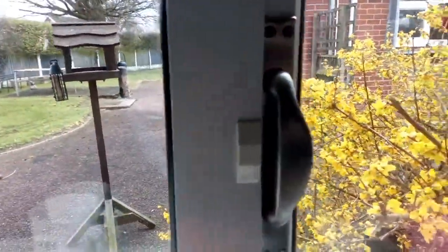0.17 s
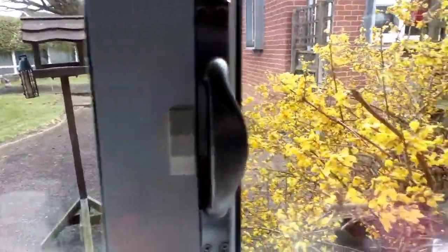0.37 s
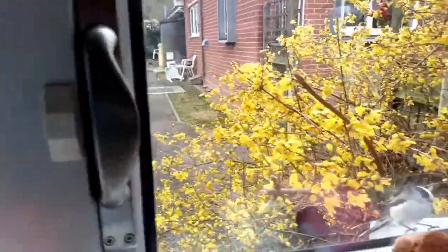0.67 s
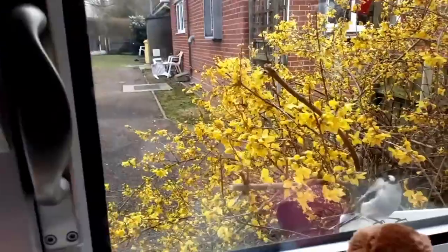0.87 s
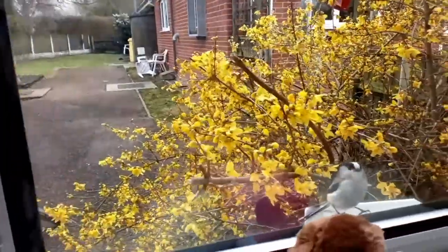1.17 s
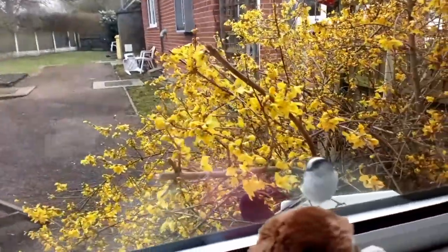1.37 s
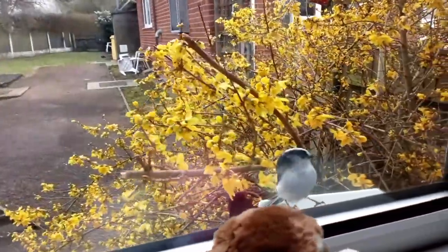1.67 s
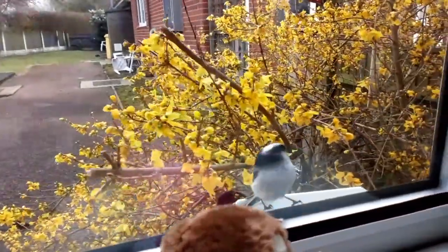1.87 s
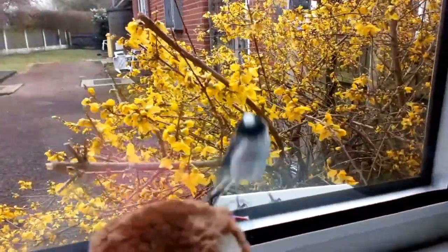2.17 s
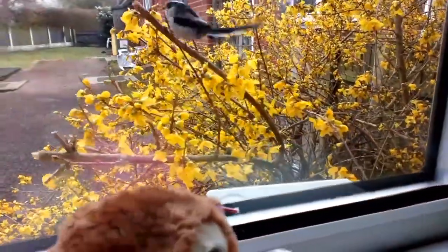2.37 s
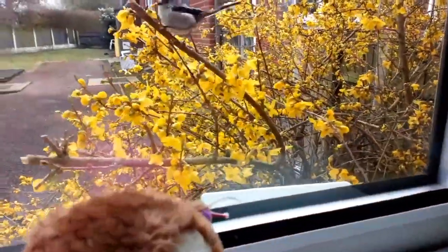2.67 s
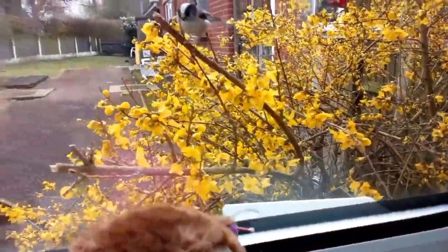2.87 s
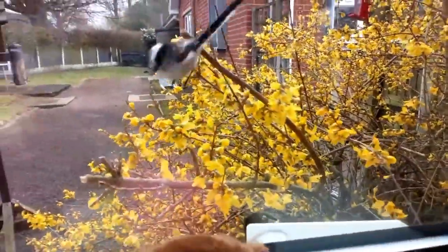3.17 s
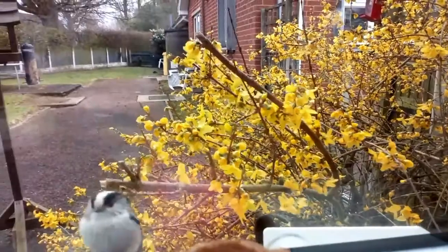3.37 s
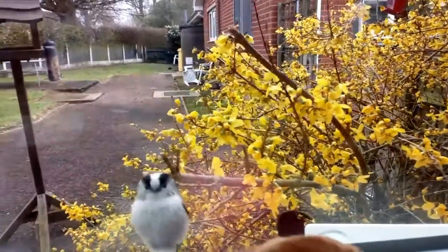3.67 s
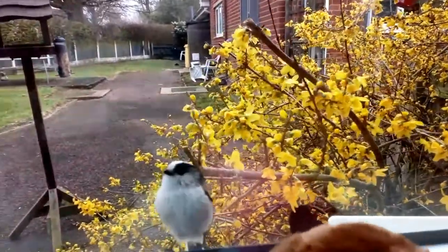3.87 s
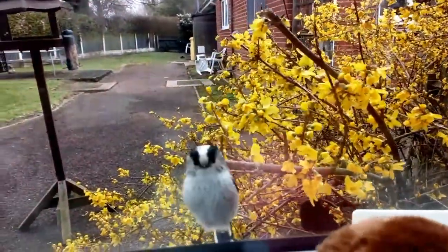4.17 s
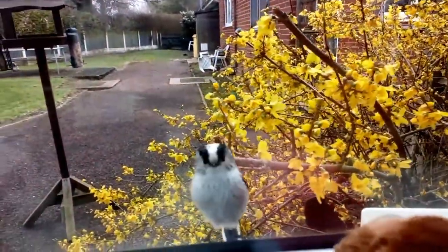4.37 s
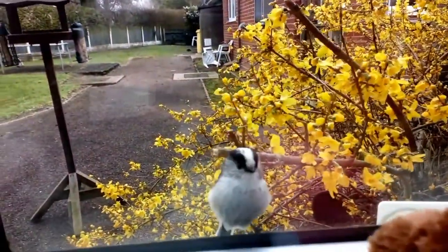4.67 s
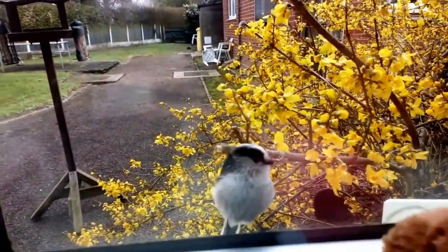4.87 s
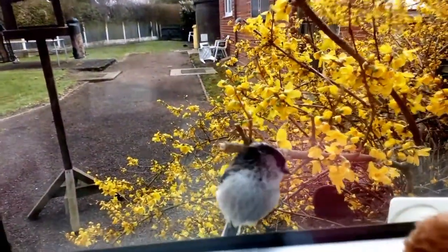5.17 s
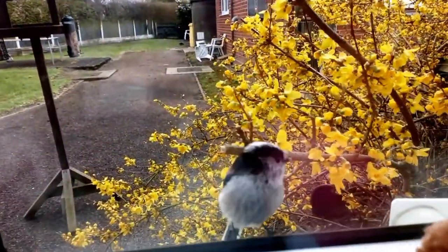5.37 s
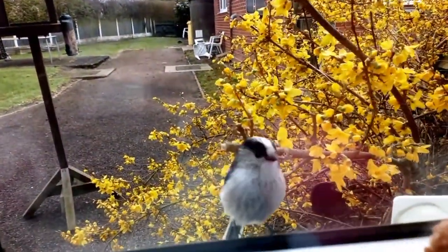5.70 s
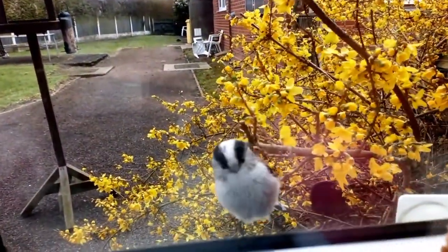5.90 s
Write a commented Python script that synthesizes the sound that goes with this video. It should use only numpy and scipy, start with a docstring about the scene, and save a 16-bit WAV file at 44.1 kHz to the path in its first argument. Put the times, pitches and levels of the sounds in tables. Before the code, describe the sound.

In a quiet room, a small bird taps the outside of a window: several soft, hollow, low knocks in the first second, then a lull with dull handling bumps and a barely audible wing flutter. It lands back with one firmer knock and faint claw scratches. Later a very sharp fingernail click snaps at the left microphone, followed by rubbing and small thumps. Low rumble, hiss and a thin whine continue throughout.

```python
"""Small bird at a window

A small bird taps and bumps against a double-glazed window, heard from inside a quiet room.
Banks of decaying sines ring the pane and thump the camera body; shaped noise makes claws, wings and cloth.
The hand holding the camera shifts and rubs, and a fingernail, a burst of port impulses, clicks at the
left microphone. Steady noise rumbles and hisses throughout, under a faint wandering sine whine."""
import sys
import numpy as np
from scipy import signal
from scipy.fft import rfft, irfft, next_fast_len
from scipy.io import wavfile
from scipy.ndimage import map_coordinates

SR = 44100
rng = np.random.default_rng(int(sys.argv[2]) if len(sys.argv) > 2 else 0)


def master(y):
    """Save y as 16-bit WAV."""
    cut = np.clip(np.atleast_2d(y).T, -1, 1)
    pcm = np.round(cut * 32767)  # scale
    wavfile.write(sys.argv[1], SR, pcm.astype(np.int16))


N = 266187  # length of the scene [samples]


def amp(db):
    """Decibels to gain."""
    return 10 ** (np.asarray(db) / 20)


def unit(x):
    """Scale to rms 1."""
    return x / np.sqrt(np.mean(x ** 2) + 1e-20)


def panned(db):
    """Left and right gains of unchanged total power for a left-right difference in dB."""
    gains = amp(np.array([[.5], [-.5]]) * db)
    return gains / np.sqrt(np.mean(gains ** 2, axis=0))


def along(points, hz):
    """Read (frequency [Hz], value) points on a log frequency axis."""
    point_hz, value = np.transpose(points)
    return np.interp(np.log(hz + 1), np.log(point_hz + 1), value)


def filtered(x, response):
    """Filter x by a gain given as a function of frequency."""
    n = x.shape[-1]
    padded = next_fast_len(n + 8192)
    spectrum = rfft(x, padded) * response(np.fft.rfftfreq(padded, 1 / SR))
    return irfft(spectrum, padded)[..., :n]


def wobble(rate):
    """A smooth random curve with rate knots a second."""
    knots = rng.standard_normal(int(N * rate / SR) + 4)
    return map_coordinates(knots, [np.arange(N) * rate / SR])


def noise(response, alike, size=N):
    """Coloured stereo noise of rms 1; alike is the common share, negative when the sides move in opposition."""
    share = np.clip(abs(alike), 0, 1)
    white = rng.standard_normal((3, size))
    common = np.array([[1], [np.copysign(1, alike)]]) * white[2]
    mixed = np.sqrt(share) * common + np.sqrt(1 - share) * white[:2]
    return unit(filtered(mixed, response))


def shape(points):
    """The gain curve through (frequency [Hz], level [dB]) points."""
    return lambda f: amp(along(points, f))


def band(hz, width_hz):
    """A resonance with steep skirts; width_hz is about its noise bandwidth."""
    return lambda f: 1 / (1 + ((f * f - hz * hz) / (1.28 * width_hz * f + 1e-6)) ** 2)


def add(track, s, sound):
    """Mix a sound into the track from time s."""
    start = max(round(s * SR), 0)
    part = sound[..., :max(N - start, 0)]
    track[..., start:start + part.shape[-1]] += part


def swell(x, s, half, db):
    """A bell-shaped swell of x that reaches db at time s and is 5 dB down half a length either side."""
    bell = np.exp(-((np.arange(N) / SR - s) / half) ** 2 / 2 * 1.146)
    return amp(db) * unit(x * bell) * np.sqrt(np.mean(bell ** 2))


# Decay of the room: (frequency [Hz], time to fall 60 dB [s])
ROOM_DECAY = [(100, 0.74), (400, 0.221), (2000, 0.254), (10000, 0.045)]


def room(x, wet_db):
    """x with the room's diffuse answer, decaying noise whose treble dies first."""
    hz, t, grid = signal.stft(rng.standard_normal((2, SR // 2)), SR, nperseg=256)
    decay = amp(-60 * t / along(ROOM_DECAY, hz)[:, None])
    tail = signal.istft(grid * decay, SR, nperseg=256)[1]
    tail = np.pad(tail / np.linalg.norm(tail[0]), ((0, 0), (300, 0)))  # 300 samples of pre-delay
    return x + amp(wet_db) * signal.fftconvolve(x, tail, axes=1)[:, :x.shape[1]]


# Room rumble colour: (frequency [Hz], relative level [dB per Hz])
AIR_COLOUR = [(12, -65.5), (20, -5.5), (139, -2), (200, -5), (312, -8), (528, -12.5), (700, -14),
              (987, -18), (1420, -18.5), (1700, -20), (2500, -27.5), (3250, -47.5), (5500, -120)]
# Microphone hiss colour: (frequency [Hz], left relative level [dB per Hz], right relative level [dB per Hz])
HISS_COLOUR = [(300, -3.5, -1), (1503, -4.5, -4.5), (2710, -0.5, -1), (6230, -2.5, -3.5), (8190, -8, -10.5),
               (9410, -6, -13), (12240, -18, -10.5), (13320, -6, -25.5), (15126, -4, -20.5),
               (15110, -2, 12.5), (15620, -37, -52.5)]
# Level of the electronic whine: (time [s], level [dB])
WHINE_LEVEL = [(0, -67.5), (1.8, -69.5), (2, -73), (3.3, -71.5), (3.55, -66.5), (3.8, -71.5), (6, -73)]
# Partials of the whine: (multiple of its pitch [ratio], relative level [dB])
WHINE_PARTIALS = [(1, 0), (1.5, -11), (2, -14)]
WHINE_HZ, WHINE_DRIFT_HZ, WHINE_JITTER_HZ = 6450, 29.6, 22.11  # centre, slow and fast wander


def background(air_db=-59.5, hiss_db=-64.0):
    """Low room noise, microphone hiss and a thin whine on the left that wanders in pitch and level."""
    air = noise(shape(AIR_COLOUR), 0.121) * amp(air_db + 0.36 * wobble(4.784))

    def hiss_gain(f):
        """One hiss curve for each microphone."""
        return np.array([shape(np.array(HISS_COLOUR)[:, [0, side]])(f) for side in (1, 2)])

    out = air + amp(hiss_db) * noise(hiss_gain, 0)
    hz = WHINE_HZ + WHINE_DRIFT_HZ * wobble(2.2) + WHINE_JITTER_HZ * wobble(90)
    db = np.interp(np.arange(N) / SR, *np.transpose(WHINE_LEVEL))
    phase = 2 * np.pi * np.cumsum(hz) / SR
    out[0] += sum(amp(db + partial_db) * np.sin(k * phase) for k, partial_db in WHINE_PARTIALS)
    return out


# Blows on the glass: (time [s], level [dB], spot across [0-1], spot up [0-1], hardness [dB per octave],
# highest pitch the contact excites [Hz], ring length [factor], left-right [dB])
TAPS = [(0.005, -37.5, .351, 0.42, -3.5, 1400, 1.25, -2.5), (0.119, -35, 0.3, 0.42, 1.28, 1004, 0.93, -2.5),
        (0.3235, -67, .36, 0.4, 18, 1380, .36, -2), (0.324, -30.5, .36, .398, -2, 1550, 1.1, -.5),
        (0.453, -53, 0.32, 0.4, 2.5, 1000, 0.91, 0), (0.679, -43, 0.37, 0.38, 7.5, 1156, 0.414, 4),
        (0.684, -27, 0.37, 0.38, 4, 985, 0.912, 2.5), (3.399, -27, .403, .303, 3, 1175, .94, 3)]
# Modes of the window pane: (frequency [Hz], level [dB], time to fall 60 dB before the blow's factor [s],
# left-right before the blow's own [dB], left leads by [radians])
PANE_MODES = [(171.6, -15.5, 0.0034, -3, 1), (198, -17, 0.113, -1.5, 0), (240.9, 0, 0.2648, -4, -.28),
              (388.9, -4.5, 0.1764, -4, -1), (419.3, -11, 0.1451, -1.5, -1.18), (502.5, -15, .12, 1, 0),
              (531.1, -8, 0.2139, 5.5, 0.4), (570.3, -23, 0.2118, 4, 0.5), (714, -27, 0.1328, -8.5, 0.62),
              (796.4, -11, 0.1042, -4.5, -1.05), (819.5, -7.5, 0.091, -3, -.5),
              (934, -16.5, 0.1841, 1, -1.57), (1055, -19, 0.0846, -8.5, -0.09),
              (1088.2, -21.5, 0.0656, -6.5, -0.5), (1126, -23.5, 0.0573, -5, -0.5),
              (1262, -20, 0.188, -2.5, -2.09), (1331, -20, 0.098, -4, -2.5),
              (1374, -11, 0.0584, -8.5, -1.1), (1714, -21.5, 0.1643, 8, 1.24), (2123, -22.5, 0.16, -1.5, 0)]
# Pattern of each of those modes: (across [half waves], up [half waves])
MODE_PATTERNS = [(2, 1), (1, 2), (3, 1), (3, 2), (1, 3), (2, 3), (3, 3), (4, 2), (1, 4), (2, 4), (5, 2),
                 (5, 3), (4, 4), (6, 2), (1, 5), (3, 5), (7, 1), (5, 4), (8, 1), (8, 3)]
# Dense short clatter of the frame: (frequency [Hz], relative level [dB per Hz])
FRAME_COLOUR = [(40, -20.5), (130, 5.5), (400, -2.5), (700, -2.5), (1000, -10.5), (1600, -6.5), (2500, -13),
                (5000, -17), (9000, -45)]
HARDNESS_HZ = 240  # a harder contact tilts the ring about this pitch
NODE_DB = -14  # what a mode still gets when struck on its node


def pane(build=0.00985, hold=1.758, frame_db=-15, frame_t60=0.1585, waver=0.352):
    """Each blow rings the glass; where it lands and how hard the contact is decide which modes speak."""
    out, t = np.zeros((2, N)), np.arange(int(.5 * SR)) / SR
    hz, mode_db, life, mode_pan_db, lead = np.transpose(PANE_MODES)
    # bending waves take some milliseconds to fill the pane, the slow low ones longest
    rise = 1 - np.exp(-t / (build * np.sqrt(hz[0] / hz[:, None])))
    for s, db, across, up, hardness_db, top_hz, ring_length, pan_db in TAPS:
        tilt = amp(hardness_db * np.log2(hz / HARDNESS_HZ))
        contact = tilt / np.sqrt(1 + (hz / top_hz) ** 10)
        # a mode speaks as strongly as the struck spot moves in its pattern
        motion = np.sin(np.pi * np.array(MODE_PATTERNS) * [across, up]).prod(axis=1)
        reach = np.hypot(motion, amp(NODE_DB))
        # each mode radiates its own pattern, so the two microphones hear it unequally and out of step
        weight = panned(mode_pan_db + pan_db) * reach * contact * amp(mode_db)
        phase = rng.uniform(0, 2 * np.pi, len(hz)) + np.array([lead, -lead]) / 2
        # the ring holds at first, then falls away ever faster
        fade = weight[..., None] * amp(-60 * (t / (ring_length * life[:, None])) ** hold)
        # the phase of each mode wanders a little at random, blurring its pitch
        drift = waver * signal.resample(rng.standard_normal((len(hz), 20)), len(t), axis=1)
        wave = np.sin(2 * np.pi * hz[:, None] * t + phase[..., None] + drift)
        ring = (rise * fade * wave).sum(axis=1)
        # a soft contact dulls the frame too
        frame_colour = lambda f: shape(FRAME_COLOUR)(f) / (1 + (f / top_hz) ** 2)
        clatter_fade = amp(frame_db - 60 * t / frame_t60) * rise[-1]
        clatter = clatter_fade * noise(frame_colour, 0.99, size=len(t))
        add(out, s, room(amp(db) * (ring + clatter), wet_db=-20.5))
    return out


# Claws scratch as the bird grips and lands: (time [s], level [dB], slide length [s], time to fall 60 dB [s])
CLAW_SCRATCHES = [(0.222, -62, 0.0103, 0.049), (0.318, -63, 0.0112, 0.084), (3.284, -61.5, 0.026, 0.09),
                  (3.377, -50, 0.0063, 0.065), (3.392, -51.5, 0.0058, 0.057), (3.399, -59.5, 0.0089, 0.16),
                  (4.655, -62.5, 0.0112, 0.044)]
# Thin narrow tones, short squeaks and a long faint ring of the glass:
# (time [s], level [dB], length [s], pitch [Hz])
THIN_TONES = [(0.221, -62, 0.0116, 2562), (0.395, -67, .008, 2650), (0.417, -68, .006, 2630),
              (3.57, -73, .21, 1726)]
# Colour of a claw on glass: (frequency [Hz], relative level [dB per Hz])
SCRAPE_COLOUR = [(150, -20), (500, 2.5), (1300, -3.5), (2200, 2), (3400, 0), (4800, -4.5), (6300, -3.5),
                 (7500, -22.5), (12000, -43)]
TONE_WIDTH_HZ, TONE_T60 = 62, 0.068  # bandwidth [Hz], time to fall 60 dB [s]


def claws(grain_db=3.5, attack=0.00077):
    """Gritty claw scratches and thin tones: each is noise that holds for its length, then dies away."""
    out, t = np.zeros((2, N)), np.arange(SR // 4) / SR
    scratches = [(s, db, length, t60, shape(SCRAPE_COLOUR)) for s, db, length, t60 in CLAW_SCRATCHES]
    tones = [(s, db, length, TONE_T60, band(hz, TONE_WIDTH_HZ)) for s, db, length, hz in THIN_TONES]
    for s, db, length, t60, colour in scratches + tones:
        grit = unit(amp(grain_db * wobble(302)[:len(t)]))  # a fast random roughness in level
        envelope = amp(-60 * np.maximum(t - length, 0) / t60) * (1 - np.exp(-t / attack))
        grainy = unit(envelope * grit * noise(colour, 0.355, size=len(t)))
        add(out, s, amp(db) * np.sqrt(np.mean(envelope ** 2)) * grainy)
    return room(out, wet_db=-10)


# Dull bumps, mostly from the shifting hands: (middle [s], half length [s], level [dB], pitch [Hz],
# left-right [dB], left-right likeness [-1 to 1])
BUMPS = [(1.588, 0.0347, -47, 86.5, 1, 0.79), (1.696, 0.039, -51, 89.6, 1, 0.76),
         (2.211, 0.0187, -51, 78, -4, 0.76), (2.278, 0.0275, -50, 77.7, -0.5, 0.59),
         (3.567, 0.026, -59.5, 315.3, -1, 0.72), (5.319, 0.0202, -49, 465, -7.5, 0.54),
         (5.32, 0.054, -48.5, 70.2, 1.5, -.6), (5.373, 0.0235, -57, 386, -11.5, 0.37),
         (5.976, 0.0273, -53.5, 368, -5.5, 0.32), (5.938, 0.0594, -48.5, 81, 3.5, -0.76)]
# Skin sliding by the left microphone: (middle [s], half length [s], level [dB])
RUBS = [(5.407, .004, -54), (5.425, 0.0151, -47.5), (5.546, 0.0094, -64), (5.593, 0.0146, -61),
        (5.748, 0.0223, -63.5), (5.829, .003, -57.5), (5.847, 0.0099, -57.5), (5.892, 0.0224, -55)]
# Handling, low rumbles with soft rustles and a few very short scrapes, and near 3.15 s a faint rustle of the
# bird's wings: (middle [s], half length [s], rumble level [dB], rustle level [dB])
HANDLING = [(2.28, 0.105, -59.5, -81.5), (2.905, 0.0293, -56, -77.5), (3.151, 0.057, -85.5, -67.5),
            (5.327, 0.0433, -50.5, -60), (5.947, 0.0687, -51.5, -65), (5.9678, .002, -54.5, -50),
            (5.981, 0.003, -52.5, -49.5), (6.008, 0.0178, -60, -63), (6.033, 0.0044, -60, -55.5)]
# Colour of sliding skin: (frequency [Hz], relative level [dB per Hz])
SKIN_COLOUR = [(1500, -37.5), (3200, -12), (4800, -0.5), (5600, -1), (6500, 5.5), (7200, -3), (8200, -18),
               (14000, -47)]
# Colour of the rustles: (frequency [Hz], relative level [dB per Hz])
RUSTLE_COLOUR = [(300, -34), (900, -10), (2200, 10), (4000, 4.5), (6500, 3.5), (8500, -9.5), (14000, -19)]
BUMP_WIDTH_HZ, RUMBLE_HZ, RUMBLE_WIDTH_HZ = 42.5, 163.7, 245


def hands():
    """Swells of noise: dull bumps, skin sliding near the left port, handling rumbles, rustles and scrapes."""
    bumps = sum(panned(pan_db) * swell(noise(band(hz, BUMP_WIDTH_HZ), alike), s, half, db)
                for s, half, db, hz, pan_db, alike in BUMPS)
    # sticking and slipping make the skin grainy
    skin = noise(shape(SKIN_COLOUR), 0) * amp(2.2 * wobble(250)) * amp([[0], [-16]])
    rustle = noise(shape(RUSTLE_COLOUR), 0.155) * amp(1.57 * wobble(120)) * amp([[1.5], [-1.5]])
    rumble = noise(band(RUMBLE_HZ, RUMBLE_WIDTH_HZ), 0.355)
    handling = sum(swell(rumble, s, half, rumble_db) + swell(rustle, s, half, rustle_db)
                   for s, half, rumble_db, rustle_db in HANDLING)
    rubs = sum(swell(skin, s, half, db) for s, half, db in RUBS)
    return bumps + handling + rubs


TAKEOFF_S, TAKEOFF_HALF_S, WING_DB = 2.265, .05, -65  # middle, half length, level
WING_HZ, WING_WIDTH_HZ, WINGBEATS_PER_S, WINGBEAT_DB = 1016, 1010, 26, 2


def wings():
    """The bird takes off, dulled by the glass: a soft flutter of noise that pulses with each wingbeat."""
    beat = amp(WINGBEAT_DB * np.sin(2 * np.pi * WINGBEATS_PER_S * np.arange(N) / SR))
    flutter = beat * noise(band(WING_HZ, WING_WIDTH_HZ), 0.294)
    return swell(flutter, TAKEOFF_S, TAKEOFF_HALF_S, WING_DB)


# The grip slips in jerks, each a short woody knock of the camera's shell:
# (time [s], peak level of the tone [dB], pitch [Hz])
JERKS = [(2.879, -51.5, 369.8), (2.895, -50, 347.5), (2.921, -45.5, 292.8), (2.943, -46, 309),
         (2.965, -51.5, 310), (5.908, -43.5, 215), (5.918, -43, 360), (5.935, -43, 375)]
JERK_PEAK_S = 0.00643  # time from start to peak
JERK_GRIT_DB, JERK_GRIT_WIDTH_HZ = -10.5, 558  # grit relative to the tone, its bandwidth


def grip():
    """Each jerk of the fingers swells the shell's ring for a few cycles, with some grit."""
    out, t = np.zeros((2, N)), np.arange(SR // 10) / SR
    envelope = (t / JERK_PEAK_S * np.exp(1 - t / JERK_PEAK_S)) ** 2
    for s, db, hz in JERKS:
        grit = amp(JERK_GRIT_DB) * noise(band(hz, JERK_GRIT_WIDTH_HZ), 0.273, size=len(t))
        add(out, s, amp(db) * envelope * (np.sin(2 * np.pi * hz * t) + grit))
    return out


# The nail skips over the camera case, catching (+1) and releasing (-1):
# (time after first touch [s], level relative to NAIL_DB [dB], direction [+1 or -1])
NAIL_SKIPS = [(0, -10, 1), (.00056, -9, -1), (.00121, 0, 1)]
# Then it rebounds lightly: (time after first touch [s], level [dB])
NAIL_REBOUNDS = [(.005, -18), (0.0121, -27)]
# Response of the microphone port under the nail: (frequency [Hz], level [dB])
PORT_RESPONSE = [(50, -6), (300, 6), (900, 11.5), (1250, 6.5), (1650, 11), (2200, 11.5), (3100, 14),
                 (4100, 15), (4700, 16), (5600, 20.5), (6500, 15.5), (7400, 0.5), (10500, -6), (12500, 0.5),
                 (15500, 6), (19000, -5.5)]
NAIL_S, NAIL_DB, REBOUND_TOP_HZ = 5.27232, 2, 7000  # first touch, skip level, rebound low-pass
FIZZ_S, FIZZ_DB, FIZZ_HZ, FIZZ_WIDTH_HZ = 0.00205, -27, 7200, 7200  # length, level, centre, bandwidth


def nail(right_db=-26, size=2048):
    """A few tiny impacts ring the left port over a faint 2 ms fizz of noise; the rebounds are duller."""
    # minimum phase from the folded cepstrum: sharp front, short ring
    cepstrum = irfft(np.log(shape(PORT_RESPONSE)(np.fft.rfftfreq(size, 1 / SR))))
    tick = irfft(np.exp(rfft(2 * cepstrum[:size // 2], size) - cepstrum[0]))
    low_pass = signal.butter(2, REBOUND_TOP_HZ, fs=SR, output="sos")
    soft_tick = signal.sosfilt(low_pass, tick)
    pushes = [(delay, direction * amp(NAIL_DB + db) * tick) for delay, db, direction in NAIL_SKIPS]
    pushes += [(delay, amp(db) * soft_tick) for delay, db in NAIL_REBOUNDS]
    out = np.zeros((2, N))
    for delay, push in pushes:
        add(out[0], NAIL_S + delay, push)
        add(out[1], NAIL_S + delay + 0.00072, amp(right_db) * push)  # the far microphone hears it later
    fizz = noise(band(FIZZ_HZ, FIZZ_WIDTH_HZ), 0, size=round(FIZZ_S * SR))[0]
    add(out[0], NAIL_S, amp(FIZZ_DB) * fizz)  # from the first touch
    return room(out, wet_db=-35.0)


def contacts(gap_s, ratio, count=3):
    """Delays of a run of contacts, each gap ratio times the one before."""
    return np.append(0, np.cumsum(gap_s * ratio ** np.arange(count - 1)))


# The finger presses on the case and settles:
# (time [s], gain on the modes [dB], loss at the second contact, growing as the root of the count [dB])
PRESSES = [(5.2743, 2.5, 12.5), (5.314, -14, 14), (5.541, -25.5, 12), (5.922, -20.5, 8),
           (5.964, -24.5, 6.5)]
# Modes of the camera body: (frequency [Hz], left level [dB], right level [dB], time to fall 60 dB [s])
CASE_MODES = [(126.5, -41.5, -60, 0.11), (166, -26, -54.5, 0.0334), (320.2, -34, -23.5, 0.032),
              (428.4, -50, -37.5, 0.035), (942, -49.5, -33, 0.023)]
SETTLE_S, SETTLE_GROWTH = 0.014, 1.68  # first gap [s], each gap over the one before [ratio]


def case(low_cut_hz=125):
    """The camera body thumps under each press of the finger, then more softly as the finger settles."""
    out, t = np.zeros((2, N)), np.arange(SR // 4) / SR
    thump = np.zeros((2, len(t)))
    for hz, left_db, right_db, t60 in CASE_MODES:
        fade = amp(np.array([[left_db], [right_db]]) - 60 * t / t60)
        thump -= fade * np.sin(2 * np.pi * hz * t)
    for s, db, loss_db in PRESSES:
        for k, delay in enumerate(contacts(SETTLE_S, SETTLE_GROWTH)):
            add(out, s + delay, amp(db - loss_db * np.sqrt(k)) * thump)
    return signal.sosfilt(signal.butter(2, low_cut_hz, "highpass", fs=SR, output="sos"), out)


def scene():
    """The quiet room, the bird at the window, the hands on the camera."""
    return background() + pane() + claws() + hands() + wings() + grip() + nail() + case()


TOP_HZ, CLIP_TOP = 16500, .85  # band limit, full-scale fraction where clipping starts


def record(dry):
    """The camera clips near full scale, drops the deepest bass and rolls off steeply at its band limit."""
    passband = lambda f: f ** 2 / (f ** 2 + 22 ** 2) / np.sqrt(1 + (f / TOP_HZ) ** 300)
    return filtered(np.clip(dry, -CLIP_TOP, CLIP_TOP), passband)


dry = scene()
out = record(dry)
master(out)
```